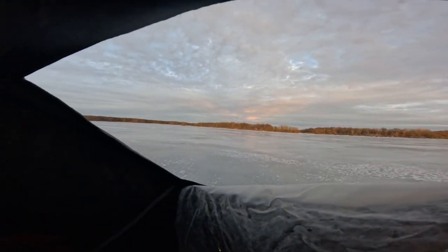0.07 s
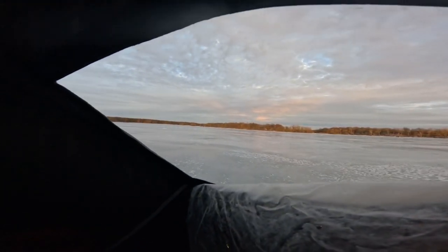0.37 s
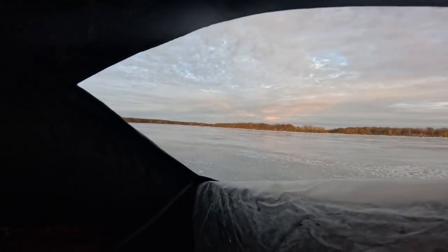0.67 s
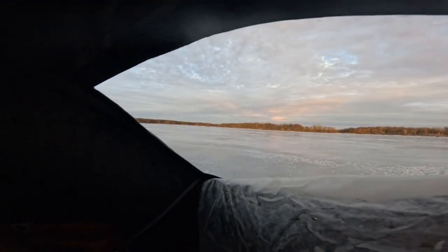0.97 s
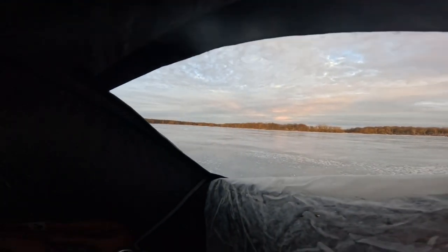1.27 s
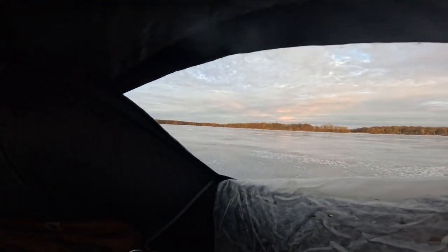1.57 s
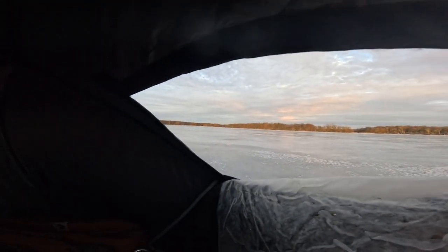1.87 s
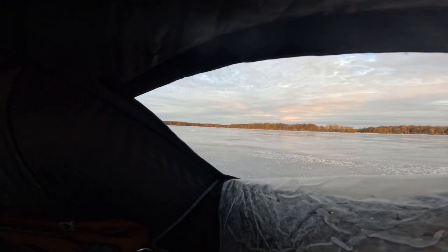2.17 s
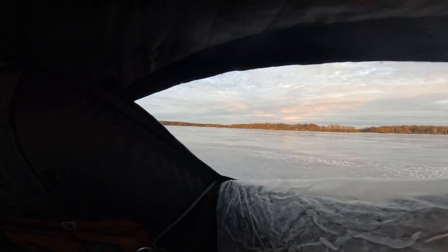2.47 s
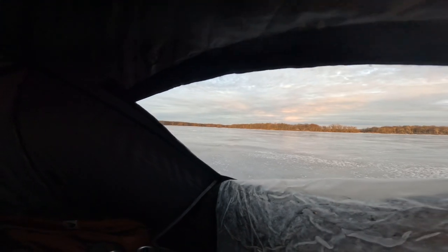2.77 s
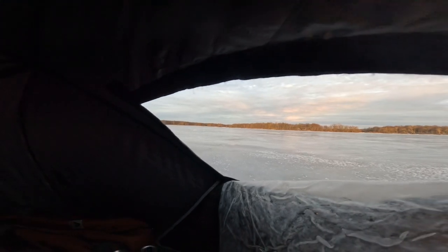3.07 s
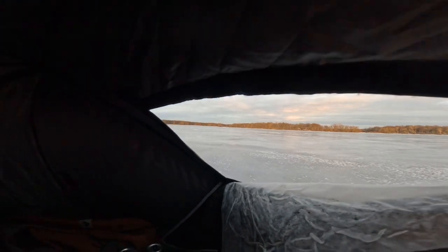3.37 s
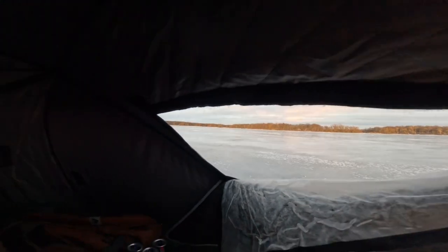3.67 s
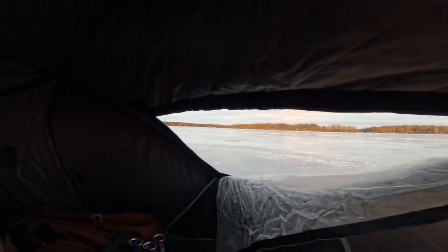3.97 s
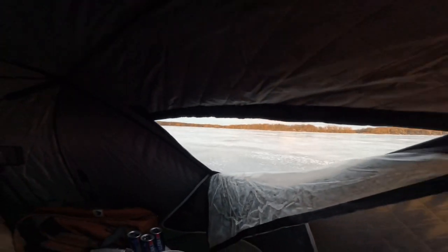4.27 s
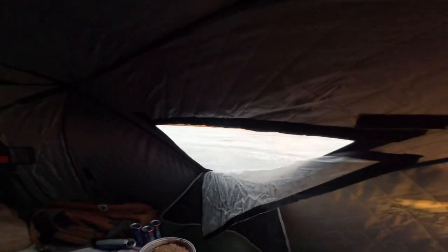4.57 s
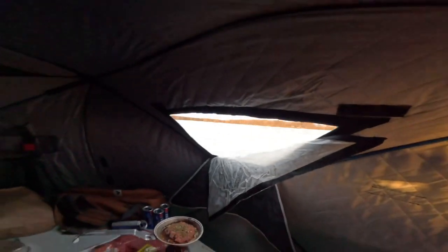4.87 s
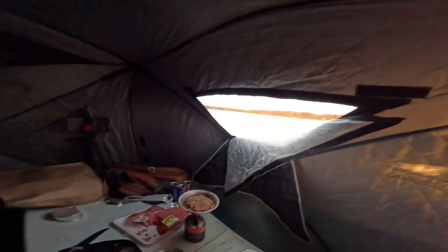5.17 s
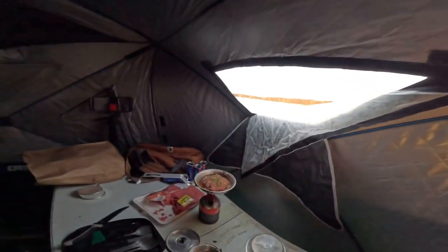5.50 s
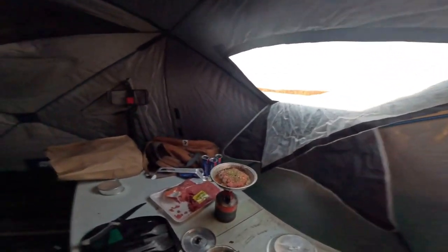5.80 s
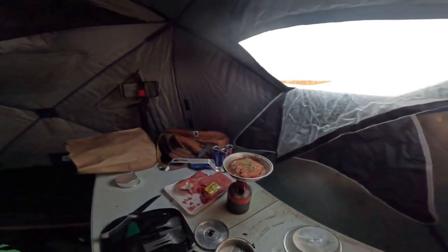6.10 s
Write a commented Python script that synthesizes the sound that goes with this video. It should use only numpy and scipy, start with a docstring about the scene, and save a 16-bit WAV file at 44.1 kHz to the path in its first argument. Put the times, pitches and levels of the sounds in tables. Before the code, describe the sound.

A faint low rumble, light scuffs and scattered crackles of stiff fabric are heard close up in a tent. Then a person moves about, cloth rubbing on cloth in uneven swishes while soft, heavy thuds grow louder and more frequent. Fingers bump and scrape the shell of the camera that holds the microphone, adding a few short, hollow knocks, mostly toward the end.

```python
"""Clothes brush along a fabric shelter on a frozen lake as someone backs away from its window.
It opens quietly: a low rumble of stirring hand and walls, a soft hiss, small scuffs, and stiff cloth
crinkling in tiny snaps. From about 3.2 s cloth rasps on cloth and the body shifts with heavier thuds.
Fingers knock and drag on a hand-held camera, ringing the modes of its shell."""
import sys
import numpy as np
from scipy import signal
from scipy.fft import rfft, irfft, next_fast_len
from scipy.io import wavfile
from scipy.ndimage import uniform_filter1d, map_coordinates

SR = 44100
rng = np.random.default_rng(int(sys.argv[2]) if len(sys.argv) > 2 else 0)


def to_wav(sig):
    """Store sig (one row per channel, or 1-D mono) as 16-bit WAV at the path in sys.argv[1].

    Samples outside -1..1 are clipped; the rate is SR.
    """
    pcm = np.clip(np.atleast_2d(sig), -1, 1) * 32767
    pcm = np.round(pcm).astype(np.int16)
    wavfile.write(sys.argv[1], SR, pcm.T)  # frames by channels


N = 279594
TIME = np.arange(N) / SR
MOVE_START_S = 3.17  # the body starts to move back
SIDES = np.array([[.5], [-.5]])  # splits a left-minus-right difference between the channels

# Rumble bed of the stirring hand and walls: time_s, sway_db, drum_db
RUMBLE_LEVELS = [(0.0, -56.5, -60), (0.49, -56.5, -64.5), (0.78, -53.5, -59.5), (1.15, -63, -60.5),
                 (1.5, -63.5, -66), (2.75, -54.5, -65.5), (3.41, -54.5, -56), (3.55, -51.5, -71),
                 (3.83, -71, -53.5), (4.1, -49.5, -61), (4.36, -46, -49.5), (5.08, -41, -51),
                 (5.33, -52.5, -57.5), (6.34, -61, -69)]
# Shifts of weight, each a swell of rumble: centre_s, length_s, sway_db, drum_db
WEIGHT_SHIFTS = [(0.146, 0.094, -48, -60), (0.374, 0.095, -52.5, -60), (0.838, 0.075, -47.5, -57),
                 (1.24, 0.046, -54.5, -60.5), (1.622, 0.31, -54.5, -65), (2.116, 0.091, -45, -54),
                 (2.485, 0.23, -54, -60.5), (2.753, 0.1, -48, -51.5), (3.514, 0.061, -46.5, -48),
                 (3.938, 0.16, -49, -51), (4.529, .11, -28.5, -36), (4.725, 0.032, -49, -37.5),
                 (5.083, 0.12, -56, -39), (5.68, 0.17, -38.5, -50.5), (5.946, 0.1, -36, -47),
                 (6.188, 0.068, -39, -51.5), (6.304, 0.049, -37, -68)]
# Deep tone of the slow sway: freq_hz, gain_db
SWAY_EQ = [(12, -20), (32, 7.5), (62, -1.5), (80, 1), (115, -9), (160, -23.5), (400, -39), (1000, -120)]
# Hollow tone of slack cloth drumming: freq_hz, gain_db
DRUM_EQ = [(50, -46), (110, 0.5), (170, 5.5), (230, -3.5), (295, -4.5), (360, -15), (600, -21),
           (1200, -38.5), (4000, -120)]
# Soft, broad tone of the hiss: freq_hz, gain_db
HISS_EQ = [(100, -30), (400, 10.5), (600, -1.5), (870, -3), (1100, 5), (1380, 2), (1650, 5.5), (2150, -7.5),
           (2700, -3), (3900, -8.5), (6500, -5), (9700, -12.5), (11000, -20), (14000, -30)]
# Fader ride of the crinkle: time_s, level_db
CRINKLE_LEVELS = [(0.1, -70), (0.6, -69), (1.35, -75.5), (3.2, -77)]
# Papery tone of stiff cloth creasing: freq_hz, gain_db
CRINKLE_EQ = [(1200, -20), (1650, 0.5), (2100, 3), (2900, -10), (4500, -30)]
# Scuffs and narrow squeaks of hand and cloth: centre_s, length_s, level_db, pitch_hz, width_octaves
BRUSHES = [(.17, 0.48, -68, 1070, 0.19), (0.294, 0.064, -59, 790, 1.4), (0.26, 0.19, -63, 418, 0.31),
           (0.816, 0.032, -66.5, 704, 0.44), (1.036, 0.051, -59.5, 760, 1.26),
           (1.565, 0.034, -62.5, 800, 1.8), (1.539, 0.027, -65, 4150, 0.4), (1.773, 0.077, -65, 660, 1.1),
           (2.285, 0.1, -64.5, 746, 1.6), (2.435, 0.016, -62.5, 520, 0.87), (2.8, 0.02, -62, 482, 0.8),
           (3.082, 0.03, -64, 553, 1.2), (3.292, 0.093, -45, 339, 0.33), (3.319, 0.015, -48, 2090, 0.63),
           (3.391, 0.01, -43.5, 1930, 1.1), (3.4, 0.041, -56, 6200, 0.36), (4.23, 0.1, -55, 567, 0.77),
           (4.403, 0.057, -55, 6960, 0.62), (4.502, 0.054, -43, 630, 0.82), (4.798, 0.069, -50.5, 830, 1.9),
           (4.856, 0.018, -50, 1720, 1), (5.085, 0.022, -51, 775, 1.5), (5.164, 0.026, -52, 810, 2),
           (5.315, 0.02, -60, 4200, 0.2), (5.634, 0.034, -44, 1790, 1.4)]
# Sharp single crackles: start_s, level_db, snap_offset_db
CRACKLES = [(0.0857, -48.5, -16), (0.1623, -46, -7), (0.172, -47, -6.5), (0.2055, -47.5, -5),
            (0.405, -46.5, -19), (0.527, -48.5, -5.5), (0.598, -46.5, -7.5), (0.7153, -56, 4.5),
            (0.7198, -41.5, -22), (0.752, -58, 3), (0.7972, -59, -9), (0.8334, -42.5, -20),
            (0.912, -43.5, -15), (0.9387, -39.5, -16), (1.0634, -42.5, -14), (1.1658, -44, -14),
            (1.229, -48.5, -12), (1.4077, -55.5, -1.5), (1.493, -46, -11), (1.637, -48, -6.5),
            (1.708, -45, -15), (1.817, -41.5, -12), (1.908, -46.5, -14), (1.9138, -51.5, -4),
            (1.939, -51.5, -4), (2.2579, -41, -14.5), (2.4293, -49, -24), (2.48, -46, -18),
            (2.4887, -40.5, -14), (2.5574, -45, -12), (2.6287, -46, -14), (2.8112, -42.5, -17),
            (2.824, -43.5, -29), (2.849, -45, -24), (2.875, -45.5, -26), (2.9902, -44, -19),
            (3.0304, -48.5, -6.5), (3.1583, -59, 3.5), (3.1955, -54, 0), (3.5117, -38, -13),
            (4.2008, -45, -26), (6.015, -51, 0.5), (6.1581, -50.5, 3.5)]
# A crackle's low snap: pitch_hz, t60_s
SNAP_MODES = [(1700, 0.011), (2150, 0.003), (3000, 0.0026)]
# A crackle's bright tick: pitch_hz, t60_s
TICK_MODES = [(5000, 0.0045), (6400, 0.0064), (7500, 0.006), (9400, 0.0024)]
# Boost on the crackles, rolling off at the very top: freq_hz, gain_db
CRACKLE_EQ = [(7500, 7.5), (10200, 7), (11500, 0), (14500, -7)]
# Dull body thuds: start_s, level_db, pitch_hz, t60_s
THUDS = [(0.335, -34.5, 76, 0.063), (1.045, -42.5, 135, 0.1), (1.134, -41.5, 91, 0.096),
         (1.408, -41, 176, 0.12), (1.713, -43.5, 160, 0.065), (2.049, -38.5, 89, 0.28),
         (3.121, -34, 65, 0.2), (3.36, -28, 345, 0.031), (3.871, -20.5, 231, 0.016), (4.01, -20, 60, 0.17),
         (4.142, -31, 44.7, 0.21), (4.2, -31.5, 212, 0.1), (4.209, -24, 57, 0.22), (4.499, -14, 32, 0.13),
         (4.507, -10, 200, 0.02), (4.559, -26.5, 234, 0.054), (4.624, -26.5, 146, 0.087),
         (4.826, -20.5, 76, 0.053), (4.959, -20.5, 70, 0.04), (5.013, -23.5, 79, 0.098),
         (5.045, -20, 106, 0.086), (5.219, -25.5, 58.5, 0.17), (5.639, -26.5, 117, 0.079),
         (5.703, -27.5, 50.3, 0.2), (5.985, -32.5, 50.4, 0.37), (6.137, -26, 51, 0.2),
         (6.261, -33, 105.2, 0.18)]
# Strokes of cloth on cloth: start_s, length_s, rub_db, sheen_db
STROKES = [(3.17, 0.24, -51, -58), (3.247, 0.12, -50.5, -64), (3.41, 0.18, -62, -64),
           (3.521, 0.024, -54, -56.5), (3.562, 0.14, -63.5, -61.5), (3.724, 0.066, -57.5, -61),
           (3.877, 0.071, -57.5, -58.5), (3.983, 0.072, -59.5, -61), (4.178, 0.03, -59, -65),
           (4.347, 0.078, -60, -58), (4.434, 0.034, -50, -55.5), (4.481, 0.04, -41, -50),
           (4.552, 0.098, -62, -65), (4.695, 0.18, -62.5, -65), (4.815, 0.029, -45.5, -56.5),
           (4.892, 0.12, -58.5, -65), (5.03, 0.28, -65.5, -63.5), (5.42, 0.049, -60, -53.5),
           (5.46, 0.19, -57, -58), (5.545, 0.08, -50, -67), (5.616, 0.022, -45.5, -54.5),
           (5.711, 0.069, -57.5, -63), (5.835, .11, -56.5, -63.5), (6.103, 0.023, -57, -60.5),
           (6.265, 0.034, -61, -67)]
# Low flutter of the folds: freq_hz, gain_db
FLUTTER_EQ = [(120, -68), (250, 5), (330, 1), (520, -5.5), (850, -15), (1500, -23), (4000, -91)]
# Midrange rasp of rubbing cloth: freq_hz, gain_db
RUB_EQ = [(300, -18), (800, -13), (1100, -1.5), (1450, -0.5), (2050, -1.5), (2400, -5), (2700, -3.5),
          (3200, -8.5), (4200, -13.5), (7000, -26), (15000, -66)]
# Silky top of the weave: freq_hz, gain_db
SHEEN_EQ = [(1500, -10), (3500, 2.5), (5000, 2), (7200, -0.5), (8200, -7), (10000, -8), (11200, -17),
            (14000, -22.5), (15000, -55)]
# Sinking note of a sliding hand: time_s, pitch_hz, level_db
HAND_SLIDE = [(3.4, 1440, -89), (3.55, 1386, -72), (3.78, 1205, -65), (3.93, 1098, -55), (4.3, 1040, -77)]
# Resonances of the camera's shell: pitch_hz, level_db, t60_s
SHELL_MODES = [(156.4, 2.5, 0.089), (268.6, 2.5, 0.064), (526, -7.5, 0.04), (924, -1, 0.033),
               (1640, -14, 0.032), (3020, -7.5, 0.0055), (3660, -9.5, 0.015), (4400, -2.5, 0.0033)]
# Finger knocks on the shell: start_s, level_db, hardness_db
KNOCKS = [(4.0113, -33, -10.5), (4.51, -23, -11), (4.702, -25.5, -1), (5.9, -30, -8), (5.907, -23.5, -12),
          (5.934, -38, -19), (5.947, -34.5, -13), (6.1196, -28.5, -3), (6.13, -44.5, 6), (6.139, -27, -31)]
# Finger drags over the shell: centre_s, length_s, level_db, hardness_db
DRAGS = [(5.864, 0.037, -47.5, -1), (5.927, 0.049, -40.5, 2), (6.138, 0.022, -38, -5),
         (6.302, 0.038, -44.5, -42)]
# Stereo image of the noise layers, 1 being mono: freq_hz, correlation
STEREO_LIKENESS = [(60, 0.93), (300, 0.83), (700, 0.6), (1400, 0.6), (3000, 0.54), (6500, 0.92),
                   (10000, 0.82), (14000, 0.11)]
# Pan of thuds and touches, mids to the right and top to the left: freq_hz, left_minus_right_db
CONTACT_PAN = [(60, 1), (200, 1), (900, -7), (3600, -14.5), (7000, 34)]
# Phase of thuds and touches, negative where the right leads: freq_hz, left_lead_rad
CONTACT_PHASE = [(60, -0.37), (220, -1.07), (900, -1.3), (4200, -0.82)]
# Tonal balance of the two microphone ports: freq_hz, left_minus_right_db
PORT_BALANCE = [(30, 3.5), (70, 2.5), (120, 1.5), (200, -2.5), (600, -1.5), (1270, 1), (2400, 1.5),
                (4300, 0), (9000, 0.5), (13000, 7.5)]


def amp(db):
    """Decibels to linear gain."""
    return 10 ** (np.asarray(db) / 20)


def unit(x):
    """Scale to rms 1."""
    return x / np.sqrt(np.mean(x ** 2) + 1e-20)


def along(points, hz):
    """Read (freq_hz, value) points on a log frequency axis."""
    freqs, values = np.transpose(points)
    return np.interp(np.log(hz + 1), np.log(freqs + 1), values)


def automation(rows):
    """One per-sample curve for each column after the time."""
    times, *columns = np.transpose(rows)
    return [np.interp(TIME, times, column) for column in columns]


def wobble(rate):
    """A smooth random curve, rate knots a second."""
    return map_coordinates(rng.standard_normal(int(N * rate / SR) + 4), [TIME * rate])


def filtered(x, response):
    """Apply a gain given as a function of frequency."""
    size = next_fast_len(N + SR // 4)
    return irfft(rfft(x, size) * response(np.fft.rfftfreq(size, 1 / SR)), size)[..., :N]


def narrowed(x, hz, octaves):
    """The band of x around one pitch, rms 1."""
    edges = np.clip(hz * 2 ** (np.array([-.5, .5]) * octaves), 20, SR / 2 - 1)
    return unit(signal.sosfilt(signal.butter(2, edges, "band", fs=SR, output="sos"), x))


def add(track, start_s, sound):
    """Drop a sound onto a track."""
    part = track[..., max(round(start_s * SR), 0):][..., :sound.shape[-1]]
    part += sound[..., :part.shape[-1]]


def ring(hz, t60):
    """One damped vibration."""
    t = np.arange(SR // 3) / SR
    return np.sin(2 * np.pi * hz * t) * np.exp(-np.log(1000) * t / t60)


def swell(centre_s, length_s):
    """A bell-shaped fade in and out."""
    return np.exp(-2 * ((TIME - centre_s) / length_s) ** 2)


def noise():
    """Two channels of white noise."""
    return rng.standard_normal((2, N))


def grains(rate, spread_db):
    """Two trains of tiny impulses with shared timing and uneven sizes, rms 1."""
    hits = rng.random(N) < rate / SR
    sizes = amp(spread_db * rng.uniform(-2.6, 2.7, N))
    return unit(hits * sizes * rng.uniform(-0.88, 1, (2, N)))


def rustle(share, rate, spread_db):
    """Smooth friction noise with a share of separate fibre slips."""
    return np.sqrt(1 - share) * noise() + np.sqrt(share) * grains(rate, spread_db)


def coloured(pair, eq):
    """EQ two unrelated signals and blend them as mid and side, rms 1."""
    def response(hz):
        width = np.arccos(np.clip(along(STEREO_LIKENESS, hz), 0, 1)) / 2
        return amp(along(eq, hz)) * np.array([np.cos(width), np.sin(width)])
    mid, side = filtered(pair, response)
    return unit(np.array([mid + side, mid - side]))


def folds(x, patchy_db):
    """Shifting folds colour friction noise differently from moment to moment."""
    spectra = signal.stft(x, nperseg=1024)[2]
    patches = uniform_filter1d(rng.standard_normal(spectra.shape[1:]), size=4, axis=0)
    patches = uniform_filter1d(patches, size=8, axis=1)
    gain = unit(amp(patchy_db * unit(patches)))
    return signal.istft(spectra * gain, nperseg=1024)[1][:, :N]


def rumble():
    """Slow sway and drumming slack cloth, in soft lumps that swell with each shift of weight."""
    bed_sway_db, bed_drum_db = automation(RUMBLE_LEVELS)
    sway_power, drum_power = amp(bed_sway_db + 0.5) ** 2, amp(bed_drum_db + 1) ** 2
    for centre_s, length_s, sway_db, drum_db in WEIGHT_SHIFTS:
        shift = swell(centre_s, length_s)
        sway_power += (amp(sway_db) * shift) ** 2
        drum_power += (amp(drum_db) * shift) ** 2
    lumps_db = 1.8 * wobble(20)
    sway = np.sqrt(sway_power) * amp(lumps_db) * coloured(noise(), SWAY_EQ)
    drum = np.sqrt(drum_power) * amp(lumps_db - 1) * coloured(noise(), DRUM_EQ)
    return sway + drum


def hiss(level_db=-66):
    """A soft, wavering hiss, dusted with faint bright crackle that fades once the body moves."""
    bed = amp(level_db + 2.8 * wobble(12)) * coloured(rustle(share=0.37, rate=600, spread_db=-1), HISS_EQ)
    bright_eq = [(hz, db + 2 * np.log2(hz / 1000)) for hz, db in HISS_EQ]
    dust_db = level_db - 7 - np.maximum(TIME - MOVE_START_S, 0)  # fades 1 dB a second
    clumps_db = 2.5 * wobble(20)
    dust = amp(dust_db + clumps_db) * coloured(grains(rate=220, spread_db=1), bright_eq)
    return folds(bed, patchy_db=3) + dust


def crinkle():
    """Stiff cloth creases in a dense run of tiny snaps that come in clumps."""
    level_db, = automation(CRINKLE_LEVELS)
    snaps = grains(rate=520, spread_db=1) * amp(3 * wobble(70))
    return amp(level_db) * coloured(snaps, CRINKLE_EQ)


def brushes():
    """Hand and cloth scuff, each time a swell of friction noise around one pitch."""
    flat_eq = [(100, 0), (10000, 0)]
    friction = coloured(rustle(share=0.13, rate=1500, spread_db=7.5), flat_eq)
    return sum(amp(db) * swell(centre_s, length_s) * narrowed(friction, hz, octaves)
               for centre_s, length_s, db, hz, octaves in BRUSHES)


def click(modes):
    """A few short resonances, detuned afresh for every hit."""
    return sum((-1) ** k * ring(hz * np.exp(0.07 * rng.normal()), t60)
               for k, (hz, t60) in enumerate(modes))


def crackles():
    """Each crackle layers a dry crack, a low snap and a bright tick, with a short tail of tiny slips."""
    out = np.zeros((2, N))
    t = np.arange(SR // 100) / SR
    for start_s, db, snap_offset_db in CRACKLES:
        slips = 0.04 * rng.standard_normal((2, len(t))) * np.exp(-t / 0.004)
        slips[:, 0] = 1  # the main hit
        snap = amp(db + snap_offset_db + 1) * click(SNAP_MODES)
        tick = amp(db - 12.5) * click(TICK_MODES)
        body = snap + tick
        body[0] += amp(db - 13)  # the dry crack
        add(out, start_s, signal.fftconvolve(slips, body[None], axes=1))
    return filtered(out, lambda hz: amp(along(CRACKLE_EQ, hz)))


def thuds():
    """Soft, heavy contacts: a damped low swing and a brief shudder of the slack cloth."""
    swing, shudder = np.zeros(N), np.zeros(N)
    t = np.arange(SR // 3) / SR
    for start_s, db, hz, t60 in THUDS:
        push = amp(db) * (1 - np.exp(-t * hz / 0.21))  # rounded attack
        add(swing, start_s, push * ring(hz, t60))
        add(shudder, start_s, push * np.exp(-np.log(1000) * t / t60))
    return swing + amp(-14) * shudder * coloured(noise(), DRUM_EQ)


def stroke(start_s, length_s, attack_share=0.34, release_s=0.035):
    """Envelope of one cloth stroke: it speeds up, holds and dies away."""
    attack = np.clip((TIME - start_s) / (attack_share * length_s), 0, 1)
    return attack * np.exp(-np.maximum(TIME - start_s - length_s, 0) / release_s)


def cloth():
    """Stroke by stroke, sliding cloth rasps, flutters in its folds and hisses along its weave."""
    lull = amp(-24 * swell(centre_s=4.3, length_s=0.089))  # the body pauses before its biggest move
    light_rustle = np.clip((TIME - MOVE_START_S) / 0.044, 0, 1) * lull  # carries on between strokes
    rub_power, sheen_power = (amp(-72.5) * light_rustle) ** 2, (amp(-72) * light_rustle) ** 2
    for start_s, length_s, rub_db, sheen_db in STROKES:
        speed = stroke(start_s, length_s)
        rub_power += (amp(rub_db) * speed) ** 2
        sheen_power += (amp(sheen_db) * speed) ** 2
    catch_db = 2.2 * wobble(90)  # the cloth catches and lets go
    flutter = amp(-2.5) * coloured(noise(), FLUTTER_EQ)
    rub = amp(catch_db) * coloured(rustle(share=0.43, rate=1400, spread_db=2), RUB_EQ)
    sheen = amp(1 + 0.52 * catch_db) * coloured(noise(), SHEEN_EQ)
    return np.sqrt(rub_power) * (flutter + rub) + np.sqrt(sheen_power) * sheen


def hand_slide(flutter_hz=270):
    """A sliding hand sings: narrow friction noise riding a sinking pitch."""
    hz, level_db = automation(HAND_SLIDE)
    phase = 2 * np.pi * np.cumsum(hz) / SR
    return amp(level_db) * unit(wobble(flutter_hz) * np.cos(phase) + wobble(flutter_hz) * np.sin(phase))


def shell(hardness_db, fingertip_hz=5500):
    """The shell rings, slightly detuned at each touch; a harder touch wakes the upper modes."""
    hardness_share = [(250, 0.059), (900, 0.82), (3500, 1)]  # freq_hz, share
    modes = 0
    for k, (hz, db, t60) in enumerate(SHELL_MODES):
        gain = (-1) ** k * amp(db + hardness_db * along(hardness_share, hz))
        modes += gain * ring(hz * np.exp(0.014 * rng.normal()), t60)
    soft_fingertip = signal.butter(2, fingertip_hz, "low", fs=SR, output="sos")
    return signal.sosfilt(soft_fingertip, modes)


def finger_knocks():
    """Each knock of a finger rings the shell once."""
    out = np.zeros(N)
    for start_s, db, hardness_db in KNOCKS:
        add(out, start_s, amp(db) * shell(hardness_db))
    return out


def finger_drags():
    """Stick-slip drags make the shell rattle and hum; hard ones add a thin, high note."""
    out = np.zeros(N)
    slips = grains(rate=700, spread_db=2.5)[0]
    sing = amp(-19.5) * narrowed(slips, hz=3620, octaves=0.038)
    hum = narrowed(slips, hz=291.4, octaves=0.15)
    for centre_s, length_s, db, hardness_db in DRAGS:
        rattle = unit(signal.fftconvolve(slips, shell(hardness_db))[:N])
        out += amp(db) * swell(centre_s, length_s) * (rattle + hum + amp(hardness_db) * sing)
    return out


def scene():
    """The mix: thuds and touches reach the right port first, with rumble and cloth all around."""
    def placement(hz):
        return amp(along(CONTACT_PAN, hz) * SIDES) * np.exp(1j * along(CONTACT_PHASE, hz) * SIDES)
    contacts = filtered(thuds() + finger_knocks() + finger_drags(), placement)
    bed = rumble() + crackles() + crinkle() + hiss()
    friction = hand_slide() + folds(cloth() + brushes(), patchy_db=3)
    return contacts + bed + friction


def record(dry, top_hz=14800):
    """Each microphone port adds its own colour, under a hard high cut."""
    return filtered(dry, lambda hz: amp(along(PORT_BALANCE, hz) * SIDES) * (hz < top_hz))


dry = scene()
out = record(dry)
to_wav(out)
```